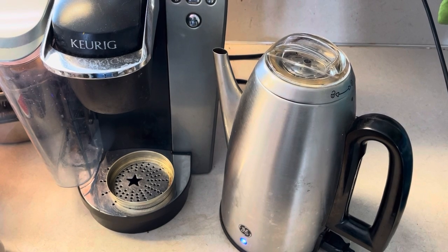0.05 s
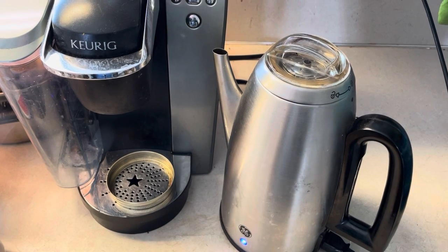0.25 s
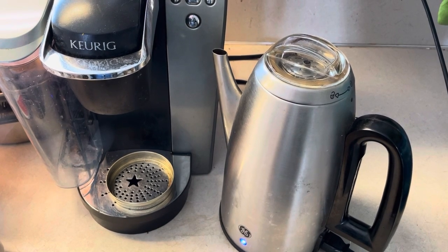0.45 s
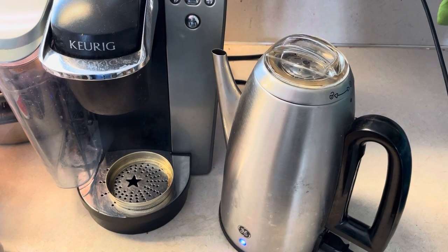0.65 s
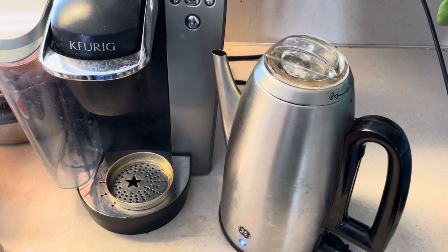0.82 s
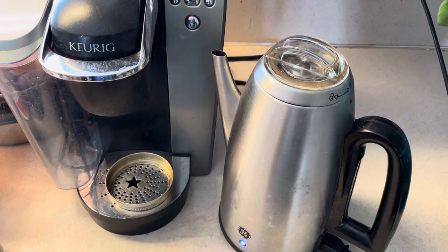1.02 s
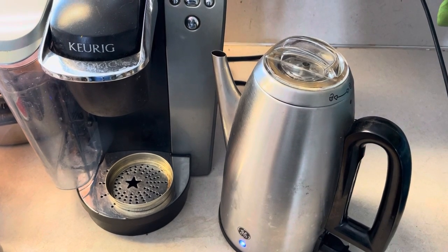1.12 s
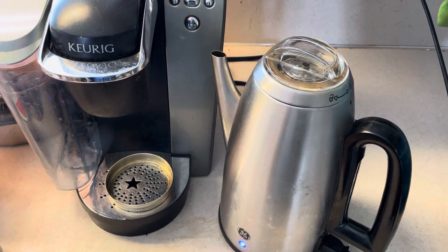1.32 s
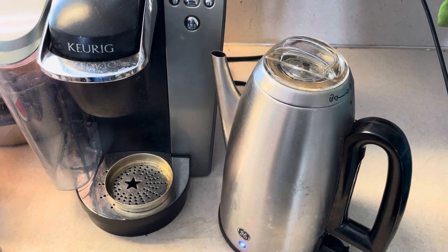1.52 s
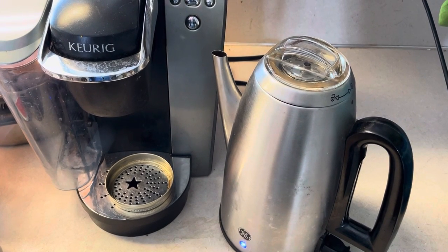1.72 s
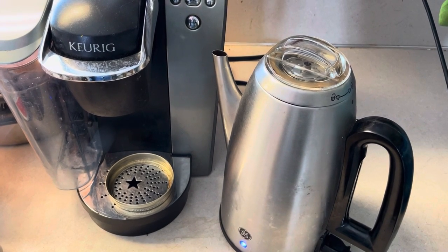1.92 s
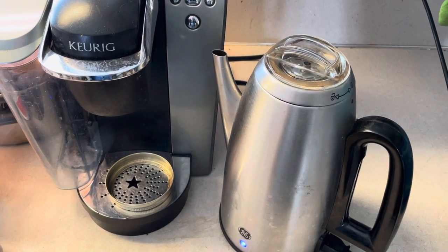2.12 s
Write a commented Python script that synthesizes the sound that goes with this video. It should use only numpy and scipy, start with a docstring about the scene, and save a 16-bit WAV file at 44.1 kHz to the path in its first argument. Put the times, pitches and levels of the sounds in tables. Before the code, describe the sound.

A coffee percolator throbs and crackles through one gurgling surge, then hisses softly.

```python
"""Kitchen counter, close up: one stroke of an electric steel percolator.
Steam drives gulps of water up the stem: the pot throbs and knocks, collapsing bubbles crackle on its wall.
Fresh water then meets the heater and hisses, finest fizz first; the simmer deepens as the bubbles grow."""
import sys
import numpy as np
from scipy import signal
from scipy.fft import rfft, irfft
from scipy.io import wavfile

SR = 44100
rng = np.random.default_rng(int(sys.argv[2]) if len(sys.argv) > 2 else 0)


def store_pcm(level_fs):
    """Save levels as 16-bit WAV."""
    pcm = np.round(np.clip(level_fs, -1, 1) * 32767).astype(np.int16)
    wavfile.write(sys.argv[1], SR, np.atleast_2d(pcm).T)


N = 94815
T = np.arange(N) / SR
FFT_SIZE = 131072
HZ = np.maximum(np.arange(FFT_SIZE // 2 + 1) * SR / FFT_SIZE, 1)

# modes of the filled pot on the counter (frequency [Hz], width [Hz], gain [dB])
POT_MODES = [(110, 23.7, 0), (189.6, 53, 1), (250.4, 27.5, -1.5), (281.2, 19.2, -0.5), (329.3, 40, -4.5)]
# modes of the steel wall (frequency [Hz], width [Hz], gain [dB])
WALL_MODES = [(740, 140, -5.5), (1053, 81, 0.5), (1642, 163, -1.5), (2036, 73, 6.5), (2514, 19, -5),
              (2960, 26, -4), (3960, 270, -10.5), (4310, 8.4, 1.5), (4900, 140, -9), (5940, 680, -14)]


def undb(db):
    """Decibels to gain."""
    return 10 ** (np.asarray(db) / 20)


def unit(x):
    """Scale to rms 1."""
    return x / np.sqrt(np.mean(x ** 2))


def envelope(rows):
    """Gain over time from (time [s], level [dB])."""
    return undb(np.interp(T, *np.array(rows).T))


def over_hz(rows):
    """Join (frequency [Hz], value) on a log axis."""
    hz, value = np.array(rows).T
    return np.interp(np.log(HZ), np.log(hz), value)


def tone(rows):
    """Minimum-phase response from (frequency [Hz], gain [dB])."""
    cepstrum = irfft(np.log(undb(over_hz(rows))))
    cepstrum[1:FFT_SIZE // 2] *= 2
    cepstrum[FFT_SIZE // 2 + 1:] = 0
    return np.exp(rfft(cepstrum))


def modes(rows):
    """Summed resonances from (frequency [Hz], width [Hz], gain [dB])."""
    return sum(undb(db) / (1 + 1j * (HZ ** 2 - hz ** 2) / (HZ * width)) for hz, width, db in rows)


def sloshed(rows, detune=0.025):
    """Moving water detunes each mode a little."""
    shifts = 1 + detune * rng.uniform(-1, 1, len(rows))
    return [(hz * shift, width, db) for (hz, width, db), shift in zip(rows, shifts)]


def through(x, response):
    """Filter by a frequency response."""
    return irfft(rfft(x, FFT_SIZE) * response)[..., :N]


def bubbles(per_s, spread_db):
    """Random clicks; a few stand out (spread > 0) or fall back (spread < 0)."""
    occurs = rng.random(N) < per_s / SR
    size = np.minimum(rng.exponential(size=N), 4)
    sign = rng.choice([-1, 1], N)
    return occurs * sign * undb(spread_db * size)


def kitchen(x, wet_db, t60_s=0.13):
    """Direct sound plus short reflections, different on each side."""
    tail = rng.standard_normal((2, N)) * np.exp(-np.log(1000) * T / t60_s)
    tail /= np.sqrt(np.sum(tail ** 2, axis=1, keepdims=True))
    reflections = through(x, rfft(tail, FFT_SIZE))
    return (x + undb(wet_db) * reflections) / np.hypot(1, undb(wet_db))


def room_noise(level_db=-81.5):
    """Faint, steady low rumble."""
    # noise spectrum (frequency [Hz], gain [dB])
    spectrum = [(20, 7), (60, 4), (200, -16.5), (500, -5), (2000, -59), (15500, -50)]
    noise = rng.standard_normal(N) + 0.5 * rng.standard_normal((2, N))
    return undb(level_db) * unit(through(noise, tone(spectrum)))


def ring(rows, direct_db, per_s, spread_db, diffuse_db):
    """Heater bubbles ring each mode separately; some arrive directly, some scattered by the room."""
    def cloud():
        return unit(bubbles(per_s, spread_db)) + undb(diffuse_db) * rng.standard_normal((2, N))
    return undb(direct_db) * cloud() + sum(through(cloud(), modes([row])) for row in rows)


def heater():
    """Growing bubbles: fizz, hiss in the steam space, then a simmer in the pot, deepest part last."""
    # modes of the steam space above the water (frequency [Hz], width [Hz], gain [dB])
    steam_modes = [(566, 7.6, -8), (673, 12, -10), (789, 37, -4.5), (945.4, 52, 0.5), (1003, 40, -5),
                   (1095, 48, -0.5), (1251, 65, -6), (1649, 63, -4.5), (2038, 160, -7), (2093, 140, -13),
                   (2520, 63, -4.5), (2932, 55, -4), (3715, 280, -10.5), (4820, 23, 0), (5120, 130, -6.5)]
    # swell of each bubble size, finest first (time [s], level [dB])
    fizz_levels = [(0, -73.5), (.3, -75.5), (.86, -81), (.91, -71.5), (.93, -61.5), (1.0, -62), (1.3, -58),
                   (1.65, -59.5), (1.95, -61), (2.15, -67)]
    hiss_levels = [(0, -61.5), (.15, -68), (.85, -81.5), (1.0, -67), (1.08, -58.5), (1.19, -51.5),
                   (1.4, -52.5), (1.58, -52), (1.85, -53), (2.15, -56.5)]
    simmer_levels = [(0, -70.5), (.2, -61.5), (1.25, -100), (1.42, -71), (1.548, -61), (1.75, -59),
                     (1.95, -54), (2.15, -58)]
    deep_levels = [(0, -70.5), (1.3, -77.5), (1.6, -76), (1.75, -63.5), (1.85, -62.5), (1.93, -58),
                   (2.15, -57)]
    # colour of each bubble size (frequency [Hz], gain [dB])
    fizz_tone = [(1000, -12.5), (3000, -8), (5000, -1), (6600, 6), (8000, -5.5), (10000, 2.5),
                 (12500, -5.5), (13500, -5.5), (15500, -24)]
    hiss_tone = [(300, -21), (600, -6), (950, 1), (2000, 1.5), (3000, -4), (3200, -6.5), (3700, -0.5),
                 (5200, -5), (6500, -9.5), (8000, -57), (15500, -68)]
    simmer_tone = [(25, -11), (110, -4), (190, 0.5), (245, -7.5), (290, 4.5), (340, 5), (400, -4.5),
                   (490, 3.5), (620, 14.5), (900, 11), (1400, 11.5), (4000, -25)]
    deep_tone = [(25, 2), (70, -4.5), (110, 1), (190, 1), (260, -8), (600, -20)]
    fizz = bubbles(per_s=14000, spread_db=1.5)
    hiss = ring(steam_modes, direct_db=-15, per_s=2800, spread_db=2, diffuse_db=-3)
    simmer = ring(POT_MODES, direct_db=-29.5, per_s=1000, spread_db=3.5, diffuse_db=-4)
    deep = through(bubbles(per_s=300, spread_db=-1.5), modes(POT_MODES))
    return (envelope(fizz_levels) * unit(through(fizz, tone(fizz_tone)))
            + envelope(hiss_levels) * unit(through(hiss, tone(hiss_tone)))
            + envelope(simmer_levels) * unit(through(simmer, tone(simmer_tone)))
            + envelope(deep_levels) * unit(through(deep, tone(deep_tone))))


def plips(low_hz=2585, high_hz=5860, q=37):
    """Free bubbles of 20 sizes, each ringing briefly at its own pitch."""
    return unit(sum(through(bubbles(per_s=70, spread_db=3.5), modes([(hz, hz / q, 0)]) / hz)
                    for hz in np.geomspace(low_hz, high_hz, 20)))


def crackle(peak_per_s=1700, direct_db=-12.5, plip_db=-5.5):
    """Boiling rings the wall: single pops when gentle, dense at its height, free bubbles among it."""
    # boiling on the wall (time [s], level [dB])
    boil_levels = [(0, -93), (.18, -69.5), (.24, -64.5), (.35, -63.5), (.42, -60), (.47, -49.5), (.53, -51),
                   (.61, -45), (.65, -47.5), (.70, -49.5), (.735, -55.5), (.76, -60.5), (.82, -64),
                   (.87, -78), (.915, -74), (.94, -55), (.98, -79), (2.15, -98)]
    # colour of the pops (frequency [Hz], gain [dB])
    pop_tone = [(200, -27), (450, -10), (700, 10.5), (1200, 8), (2200, 7), (4000, 5), (5600, -3),
                (7000, -28), (10000, 0), (15500, -18.5)]
    wall = (modes(WALL_MODES) + undb(direct_db)) * tone(pop_tone)
    boil = envelope(boil_levels)
    density = np.sqrt(boil / boil.max())
    pops = bubbles(peak_per_s * density, spread_db=4.5) / np.sqrt(density)
    return boil * (unit(through(pops, wall)) + undb(plip_db) * plips())


def spits(direct_db=-8.5):
    """Short rushes of like-sized bubbles collapse and leave the wall ringing."""
    # bubble clusters (start [s], level [dB], centre [Hz], width [Hz], length [s])
    clusters = [(0.07, -54.5, 1920, 397, 0.013), (0.079, -55, 3450, 493, 0.0076),
                (0.139, -53.5, 2030, 350, 0.0037), (0.194, -53, 2440, 2520, 0.017),
                (.210, -43, 1780, 450, 0.0094), (0.222, -47.5, 2700, 2620, 0.008),
                (.248, -52, 3080, 2020, 0.008), (0.272, -55.5, 3870, 1000, 0.012),
                (0.302, -48, 2020, 300, 0.011), (0.326, -48, 4140, 3560, 0.0059),
                (0.369, -53, 2900, 710, 0.018), (0.385, -47.5, 2070, 380, 0.0085),
                (0.421, -51.5, 3000, 610, 0.04), (0.437, -55, 3280, 3000, 0.007),
                (0.489, -42, 2030, 400, 0.0068), (0.538, -44, 3500, 1540, 0.0096),
                (0.576, -46, 4360, 1510, 0.0085), (0.605, -43, 4600, 1810, 0.014),
                (0.623, -42.5, 4760, 2150, 0.0076), (0.695, -44, 4540, 1460, 0.01),
                (0.723, -53, 4600, 2500, 0.015), (0.805, -54.5, 1230, 900, .009),
                (.885, -55, 950, 300, 0.0035), (0.926, -50, 5840, 9000, 0.0025),
                (0.933, -56, 1420, 400, 0.012), (0.925, -51, 1030, 700, 0.0073),
                (0.939, -50.5, 770, 500, 0.014), (1.486, -51, 2100, 900, 0.004)]
    # colour of all spits (frequency [Hz], gain [dB])
    spit_tone = [(200, -18), (600, 14), (5800, -5.5), (7500, -10.5), (11000, -1), (15500, -12)]
    colour = tone(spit_tone)
    clicks = bubbles(per_s=10000, spread_db=2)
    out = np.zeros(N)
    for start_s, db, hz, width_hz, length_s in clusters:
        wall = (modes(sloshed(WALL_MODES)) + undb(direct_db)) * colour
        band = modes([(hz, width_hz, 0)]) * modes([(hz, 4 * hz, 0)])
        burst = clicks * (T >= start_s) * np.exp(-((T - start_s) / length_s) ** 2)
        spit = through(burst, wall * band)
        out += undb(db) * spit * np.sqrt(length_s * SR / np.sum(spit ** 2))
    return out


def churn():
    """Small steam pockets keep the pot's low modes ringing."""
    # churning (time [s], level [dB])
    levels = [(0, -65.5), (.13, -60.5), (.23, -48.5), (.29, -51), (.40, -52), (.49, -45.5), (.62, -40.5),
              (.72, -42), (.755, -44.5), (.79, -38.5), (.90, -46.5), (.97, -52.5), (1.05, -55), (1.13, -63),
              (1.19, -51.5), (1.29, -82.5), (2.15, -77)]
    # colour of the pockets (frequency [Hz], gain [dB])
    pocket_tone = [(30, -9.5), (65, 2.5), (110, 8), (190, 3.5), (335, -2), (390, -14.5), (550, -21.5),
                   (690, -9), (1100, -7.5), (2500, -56.5), (16000, -76)]
    pockets = bubbles(per_s=260, spread_db=1.7)
    return envelope(levels) * unit(through(pockets, modes(POT_MODES) * tone(pocket_tone)))


def knocks():
    """Big steam pockets cave in and strike the pot's low modes."""
    # collapses (start [s], peak [dB], low-pass cutoff [Hz])
    collapses = [(0.173, -48.5, 402), (0.327, -40, 348), (.443, -42, 350), (0.513, -47, 400),
                 (0.769, -32.5, 373), (.781, -43, 340), (.810, -31, 393), (0.847, -37.5, 350),
                 (0.887, -35, 390), (.906, -33, 400), (0.944, -39, 440), (1.011, -35.5, 672),
                 (1.154, -36, 600)]
    # colour of the push (frequency [Hz], gain [dB])
    push_tone = [(30, -26), (65, 11.5), (150, 1.5), (335, -0.5), (385, -10.5), (560, -14), (690, 6),
                 (1100, -1), (2500, -42), (16000, -53)]
    colour = tone(push_tone)
    out = np.zeros(N)
    for start_s, db, cutoff_hz in collapses:
        impulse = signal.unit_impulse(N, int(start_s * SR))
        push = signal.lfilter(*signal.butter(3, cutoff_hz, fs=SR), impulse)
        knock = through(push, modes(sloshed(POT_MODES)) * colour)
        out += undb(db) * knock / np.abs(knock).max()
    return out


def gulps(attack_s=0.012, decay_s=0.0088, wobble_rms=0.058):
    """Each gulp swings the water column in the stem at an unsteady pitch, holds and dies away."""
    # swings of the column (start [s], length [s], pitch [Hz], peak [dB])
    swings = [(0.072, 0.05, 109, -47), (0.159, 0.06, 110, -48.5), (0.217, 0.027, 103.3, -40),
              (0.325, 0.11, 110, -45), (.432, 0.061, 110, -42.5), (.495, 0.031, 105, -32.5),
              (.550, 0.029, 109, -32), (.605, 0.026, 102, -32.5), (.650, 0.083, 108.5, -29.5),
              (.785, 0.037, 114, -38), (0.83, 0.022, 125.6, -33.5), (.893, 0.054, 113.6, -32.5),
              (0.982, 0.063, 96, -46), (1.067, 0.03, 101, -47.5), (1.16, 0.04, 121, -43),
              (1.225, 0.039, 110, -55), (2.113, .04, 114.6, -49)]
    flutter = unit(through(rng.standard_normal(N), modes([(25.1, 9.3, 0)]) ** 2))
    wobble = 1 + wobble_rms * flutter
    out = np.zeros(N)
    for start_s, length_s, hz, db in swings:
        age_s = T - start_s
        swell = np.clip(age_s / attack_s, 0, 1) * np.exp(-np.maximum(age_s - length_s, 0) / decay_s)
        phase = 2 * np.pi * np.cumsum(hz * wobble * (age_s > 0)) / SR
        out += undb(db) * swell * np.sin(phase)
    return out


def scene():
    """The stroke and the hiss that follows, in a quiet kitchen."""
    throb = kitchen(gulps() + churn() + knocks(), wet_db=-16)
    boiling = kitchen(crackle() + spits(), wet_db=-3)
    return throb + boiling + room_noise() + heater()


def record(dry, cutoff_hz=15600):
    """Left and right differ in level and phase by frequency; the top is cut."""
    # left against right (frequency [Hz], level [dB])
    stereo_level = [(100, -.5), (350, -.6), (700, -3.3), (1300, -1.5), (2100, -3.4), (3300, -4.5),
                    (4300, -3.4), (6000, -5.5), (7100, 0), (15500, 0)]
    # left against right (frequency [Hz], phase [rad])
    stereo_phase = [(100, -.04), (400, -.1), (1200, -.3), (1650, -2), (1850, -5.2), (2150, -6.2),
                    (3200, -7), (4300, -6.7), (5800, -7.3), (6900, -9.3), (8800, -9.3), (10400, -6.4),
                    (12300, -6.2), (13400, -3.3)]
    left = undb(over_hz(stereo_level) / 2) * np.exp(0.5j * over_hz(stereo_phase))
    heard = through(dry, np.array([left, 1 / left]))
    return signal.sosfilt(signal.ellip(8, 0.2, 70, cutoff_hz, fs=SR, output="sos"), heard)


dry = scene()
out = record(dry)
store_pcm(out)
```